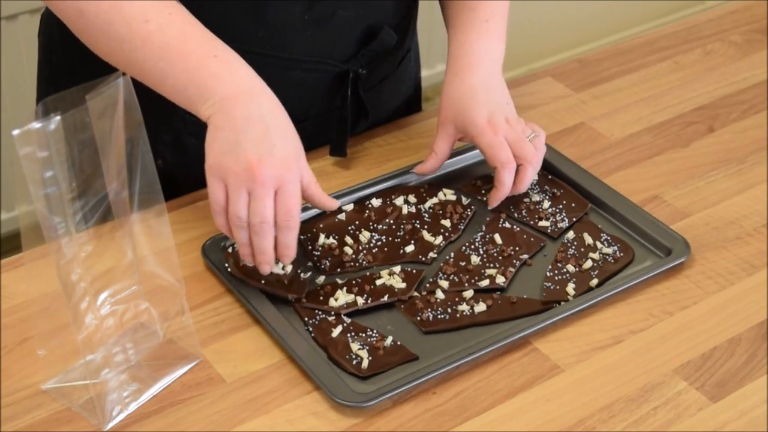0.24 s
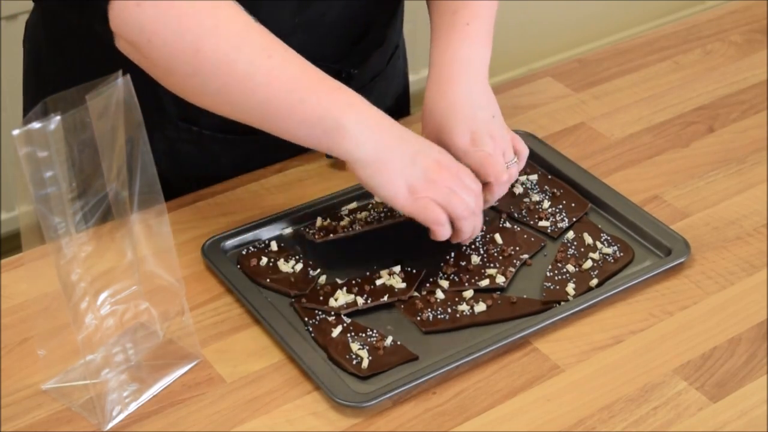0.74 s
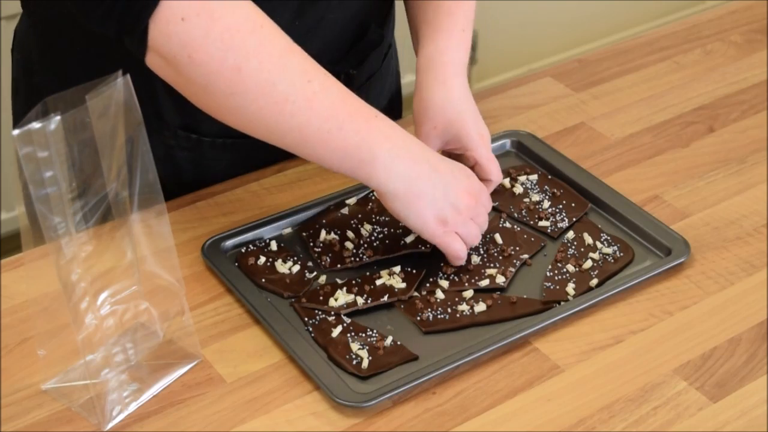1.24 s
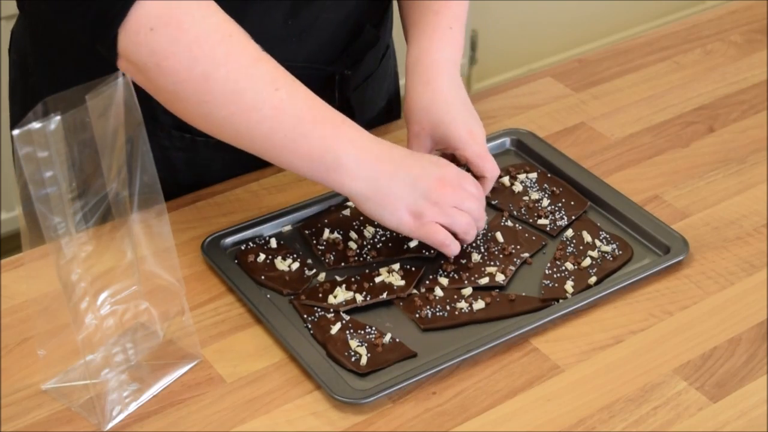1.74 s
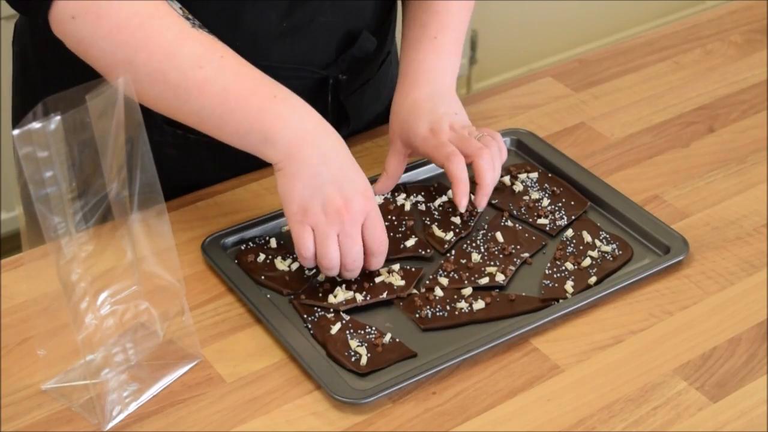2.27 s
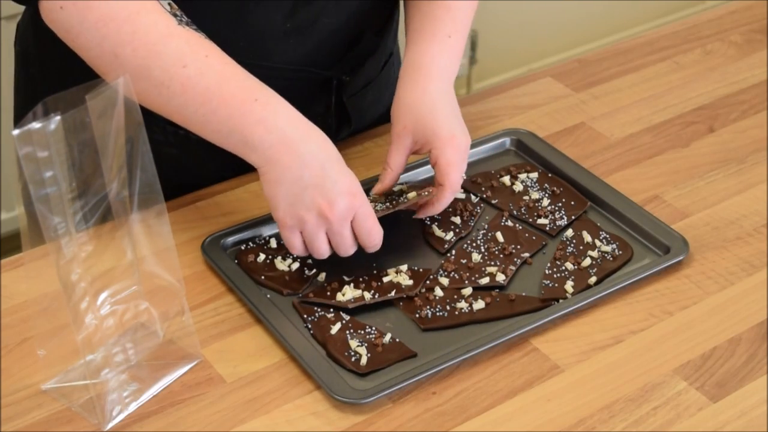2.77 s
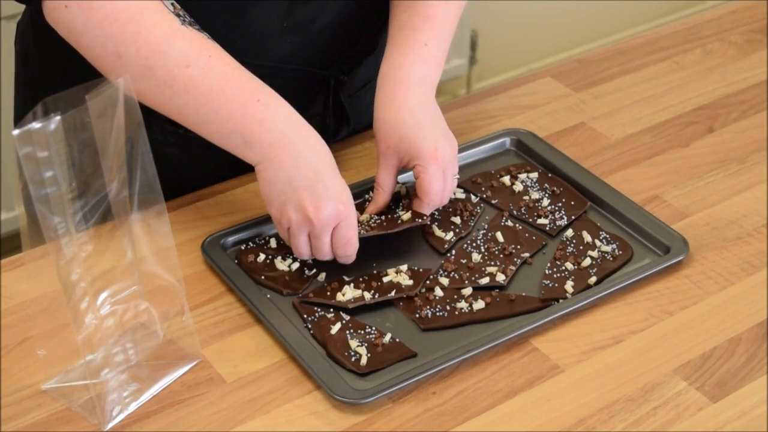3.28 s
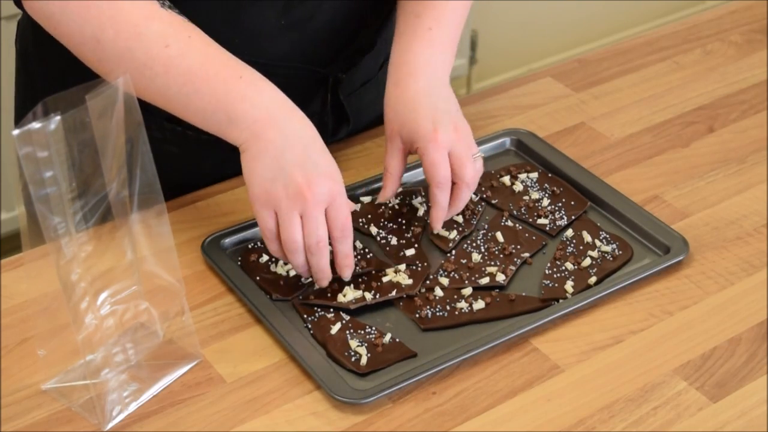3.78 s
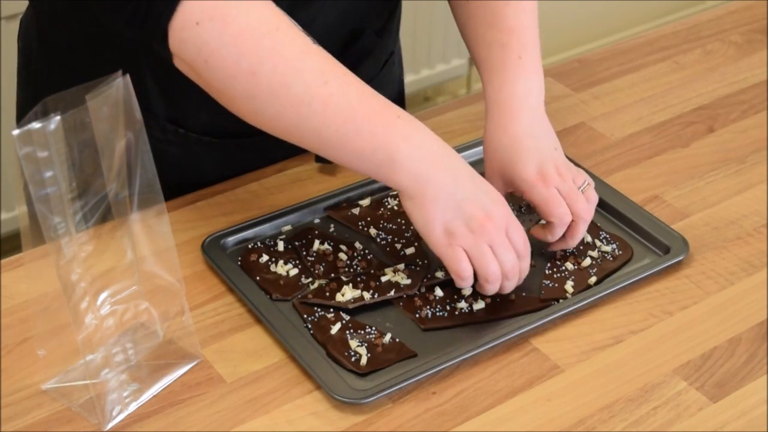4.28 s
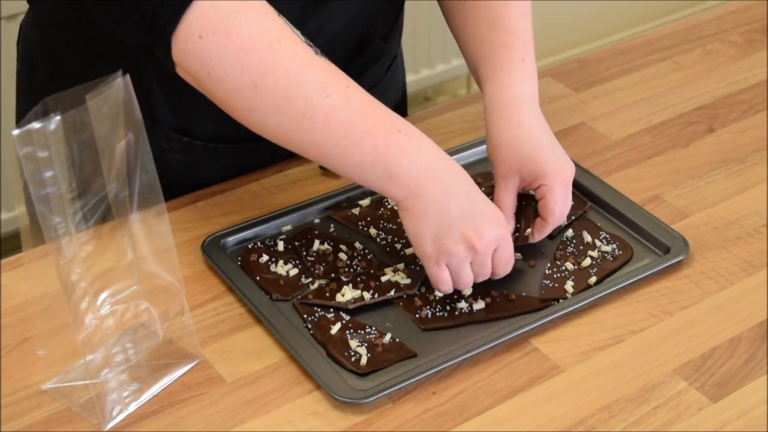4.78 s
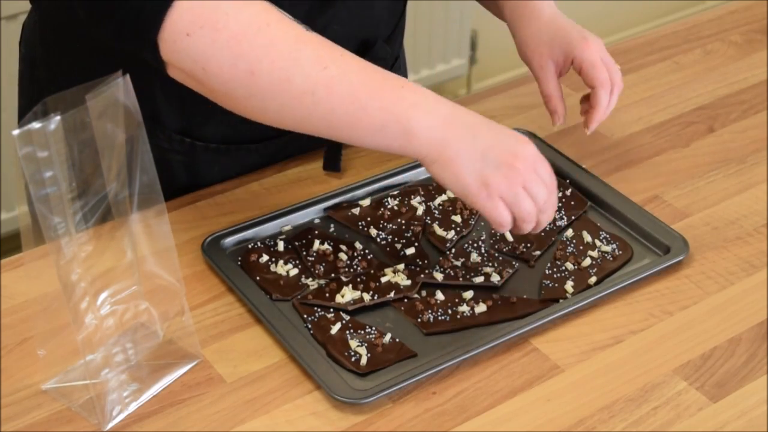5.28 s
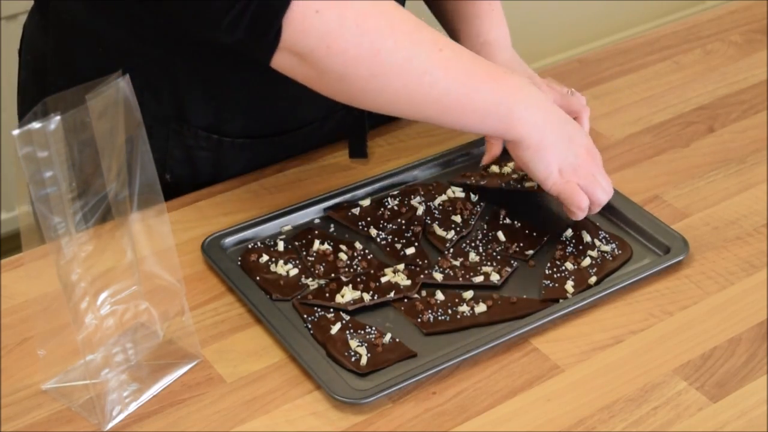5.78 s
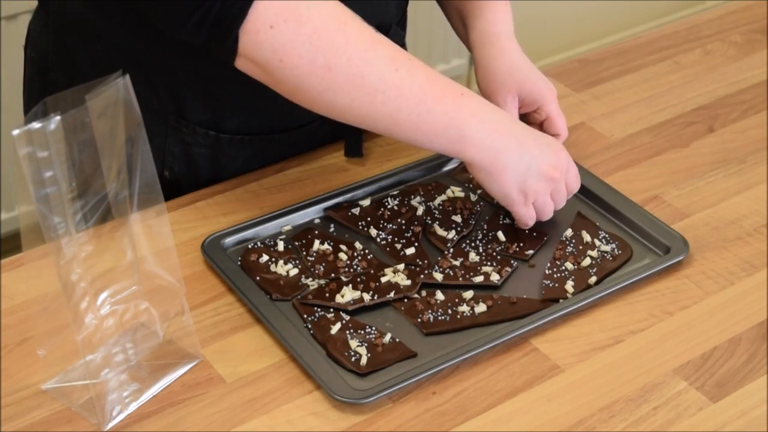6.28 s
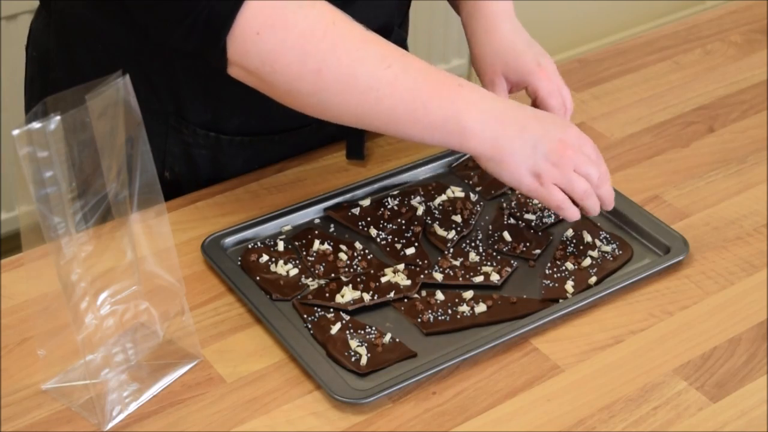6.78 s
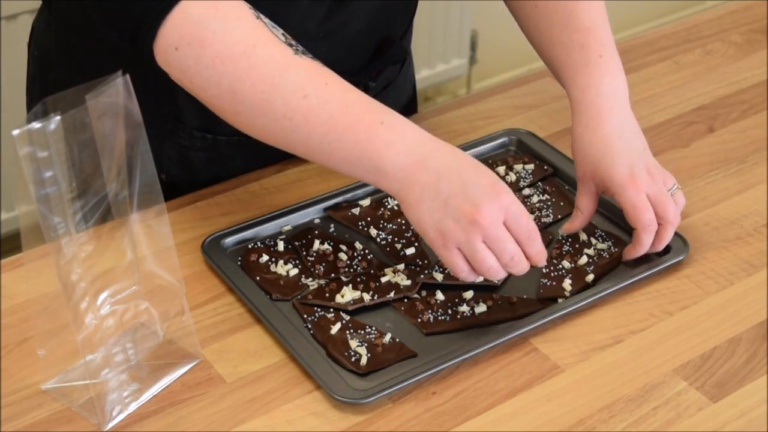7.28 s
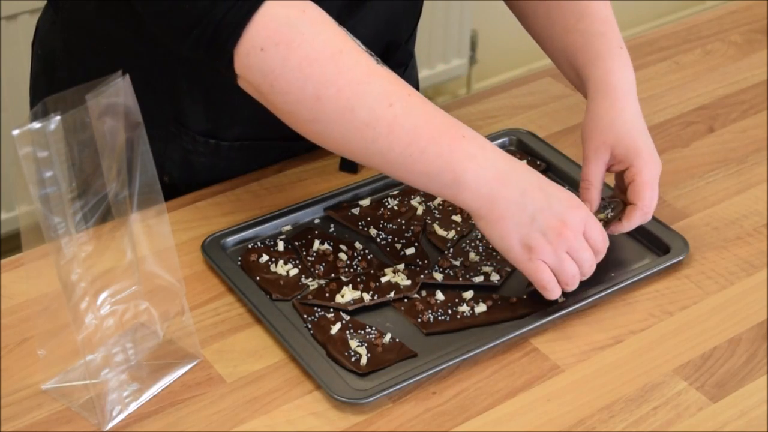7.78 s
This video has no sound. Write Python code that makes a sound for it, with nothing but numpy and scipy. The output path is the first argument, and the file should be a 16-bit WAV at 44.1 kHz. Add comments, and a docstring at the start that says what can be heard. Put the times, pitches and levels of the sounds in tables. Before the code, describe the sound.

Close stereo sound of chocolate slabs snapped by hand over a steel baking tray in a hard-walled kitchen. Light clacks and a faint gritty slide begin at once, with two loud crisp snaps at about 0.26 and 0.35 s and smaller knocks until 0.7. Quiet ticks follow, then sharp cracks at 1.6 and 1.95 s. From 2.2 to 3.2 s come scattered soft clicks, with a firmer one at 2.9. A bright tick at 3.5 leads to a cluster of knocks and scrapes around 3.8, then light handling, with clacks at 4.7 and 5.0. A strong snap lands at 5.75; after a pause, a knock at 6.5 starts a dense clatter from 6.6 to 6.9, tapering into small ticks by 7.7. Short echoes, steady soft room noise and a faint thin appliance whine continue throughout; brief hums come and go, and a faint low drone rises near 6.8 s.

```python
"""Snapping chocolate on a steel tray

Brittle slabs of chocolate are snapped by hand and dropped, nudged and slid on a steel baking tray.
Each contact is a short volley of tiny cracks that sets the slab, the tray and a hard-walled kitchen sounding.
An appliance whirrs faintly behind in steady tones and filtered noise, with a hum that comes and goes.
A low drone swells near the end, over a steady bed of room noise."""
import sys
import numpy as np
from scipy import signal
from scipy.fft import rfft, irfft
from scipy.io import wavfile
from scipy.ndimage import uniform_filter1d

SR = 44100
rng = np.random.default_rng(int(sys.argv[2]) if len(sys.argv) > 2 else 0)


def file_out(sig):
    """Save sig as 16-bit WAV at sys.argv[1]."""
    # one column per channel
    cols = np.atleast_2d(sig).T
    # limit, then scale
    lim = np.clip(cols, -1, 1)
    pcm = np.round(lim * 32767).astype(np.int16)
    wavfile.write(sys.argv[1], SR, pcm)


N = 354123

# ringing tones of the steel tray: pitch_hz, level_db (before the tray's band-pass), t60_s (time to fall 60 dB)
TRAY_MODES = [(252, -41, 0.047), (340, -47, 0.11), (389, -38, 0.085), (684, -32, .11), (877, -32.5, 0.069),
              (1025, -34, 0.067), (1225, -33, .1), (1538, -33, 0.058), (1772, -37, 0.045),
              (2028, -35.5, 0.058), (2280, -33.5, 0.052), (2820, -38.5, .05), (3176, -39, 0.04)]
# plate tones of a slab: ratio_to_pitch, level_db (next to the hump at its pitch)
SLAB_MODES = [(.6, -12), (1.45, -9.5), (1.95, -11.5), (2.5, -16.5)]
SLAB_LOW_HZ, SLAB_TOP_HZ = 597, 4290


def contacts():
    """Each contact is a volley of cracks that builds fast and dies, through slab, fracture edge and tray."""
    # snaps and knocks: start_s, slab_peak_db (estimated from loudness), edge_gain_db and tray_gain_db
    # (both on top of the slab's scaling), slab_pitch_hz, volley_ms (decay time, kept within 1 to 30)
    contact_rows = np.array([(0.004, -30.5, -15, -15, 3030, 13), (0.018, -27, -14, -22, 1070, 16),
                             (0.056, -28.5, -20, -12, 1900, 14), (0.09, -34, -11, -8, 1130, 7.6),
                             (0.111, -40, 1.5, -16, 1950, 12), (0.133, -37, -8.5, -8, 980, 14),
                             (0.142, -39.5, -11, -12.5, 1210, 4.2), (0.244, -35.5, -34, -17, 1018, 5.4),
                             (0.264, -11, -16.5, -17.5, 2100, 6.2), (0.346, -13.5, -11, -17, 2330, 7.8),
                             (0.41, -30, -34, -13, 2190, 17), (0.419, -29, -10, -8.5, 1980, 10),
                             (0.476, -21.5, -15, -19, 1800, 8.8), (0.504, -26.5, -8, -10.5, 1900, 7.2),
                             (0.571, -35.5, -27, -12.5, 1287, 4.4), (0.663, -34, -10.5, -36, 2680, 7),
                             (0.917, -36.5, -9, -18, 1050, 6.5), (1.072, -44.5, -10, -30, 1040, 6.2),
                             (1.153, -44.5, -10, -25, 2260, 11), (1.251, -45, -18, -12, 2100, 8),
                             (1.276, -46, -25, -10, 2200, 6), (1.365, -42, -25, -12, 1460, 4),
                             (1.373, -45.5, 1, -10.5, 1460, 8), (1.581, -20.5, -9, -37, 1770, 2.6),
                             (1.589, -11.5, -8.5, -20, 1720, 6.8), (1.738, -30, -10.5, -22, 1740, 11.6),
                             (1.79, -37.5, -11.5, -26, 1730, 19), (1.953, -13, -14.5, -15.5, 1550, 8.4),
                             (2.208, -30, -23, -29, 1080, 7.7), (2.231, -28.5, -10.5, -13, 1980, 5.4),
                             (2.265, -44, -8, -9, 2040, 9.4), (2.354, -36.5, -20, -33, 1140, 8.7),
                             (2.378, -34.5, -10.5, -20, 1970, 7.1), (2.471, -36, -19, -24, 1030, 24),
                             (2.547, -45, -3.5, -26, 2070, 7.9), (2.887, -28, -9, -36, 1130, 8),
                             (2.893, -22, -12, -16, 1230, 5.4), (3.163, -34, -8.5, -17, 3100, 6.1),
                             (3.459, -21, -1, -10.5, 2080, 7.8), (3.630, -34, -8, -9.5, 1680, 30),
                             (3.694, -41, 1.5, -30, 2400, 26), (3.732, -41, -12, -24, 3000, 7.2),
                             (3.768, -31.5, -15, -14.5, 1530, 27), (3.789, -21, -7, -17.5, 1960, 13),
                             (3.827, -29, -25, -7, 1570, 8.2), (3.87, -32.5, -7, -10, 1950, 7.5),
                             (3.906, -40, -7, -18, 1030, 8.6), (4.097, -36.5, -8.5, -15.5, 2210, 12.5),
                             (4.156, -38, -13, -13, 1000, 13), (4.178, -43, -8, -29, 1270, 35),
                             (4.401, -34.5, -23, -16, 2280, 25), (4.42, -35, -6, -16, 1070, 9),
                             (4.592, -47, 2.5, -18, 2260, 6), (4.737, -37, -9, -11, 2200, 8.1),
                             (4.743, -24, -10.5, -10.5, 2600, 4.6), (4.917, -41.5, -6, -9.5, 2770, 22),
                             (4.939, -36.5, -6, -18, 1720, 14), (4.999, -42.5, -6, -14, 1020, 6.5),
                             (5.044, -21.5, -10, -13.5, 2010, 8.4), (5.074, -35.5, -13, -7, 1680, 31),
                             (5.275, -41.5, 1.5, -16, 3440, 6.1), (5.623, -40.5, -12.5, -10.5, 1650, 35),
                             (5.739, -32.5, -23, -14, 1590, 7.3), (5.750, -16, -8.5, -19, 2050, 15),
                             (5.787, -24, -16, -15, 1780, 7.7), (6.474, -22, -5, -18, 1840, 9.2),
                             (6.625, -38, -10, -18, 2160, 11), (6.644, -31.5, -6.5, -19, 1120, 11),
                             (6.662, -21, -14.5, -16, 1860, 12.8), (6.687, -39, -2, -17, 1800, 11),
                             (6.767, -25, -10.5, -14.5, 1810, 14), (6.806, -28, -2.5, -18.5, 1080, 6.7),
                             (6.826, -32, -17, -16, 1800, 7.9), (6.845, -14.5, -13, -18, 1770, 8),
                             (6.894, -23, -10, -24, 1800, 17), (6.923, -21.5, -8.5, -19.5, 1900, 9.6),
                             (7.242, -36.5, -7.5, -31, 1780, 10), (7.339, -27, -11, -37, 5200, 3.6),
                             (7.354, -34, -13, -37, 1770, 22), (7.403, -37.5, -25, -16, 2700, 18),
                             (7.435, -34, -13, -13, 2100, 35), (7.479, -32, -13.5, -18, 1080, 5.9),
                             (7.536, -34, -17, -25, 1830, 6.1), (7.557, -36.5, -16, -15.5, 1070, 9.3),
                             (7.694, -42, -18, -11.5, 1190, 12), (7.711, -40, -18, -12, 2090, 3.7)])
    # where the pieces meet the tray decides the tone it favours: from_s, favoured_hz
    spot_rows = [(0, 1225), (.05, 880), (.125, 670), (.2, 880), (.33, 2280), (.4, 1025), (1.5, 387),
                 (1.9, 684), (2.8, 1225), (3.4, 684), (3.75, 1225), (3.81, 877), (4.3, 1025), (5.7, 1990),
                 (5.77, 877), (6.4, 390), (7.46, 684)]
    spot_lift_db, spot_width_octaves = 10, 0.15
    tray_late_s = 0.007954   # the piece meets the steel just after it cracks
    count, size = len(contact_rows), 4096

    # age counts time in volley decay times
    age = np.arange(size) / SR / np.clip(contact_rows[:, 5:6] / 1000, 1e-3, 0.03)
    volleys = cracks((count, size), per_s=4500, spread_db=3.0) * (1 - np.exp(-age / 0.075))
    # the break runs in slight fits and starts
    splinters = resonate(rng.standard_normal((count, size)), 96, 220)
    fits = from_db(0.51 * rms_one(splinters) * np.minimum(age, 1))
    crumbs = 0.045 * np.exp(-age / 3.6)   # they rattle on after the break
    volleys *= fits * (np.exp(-age) + crumbs)

    # each tray tone is stronger near the favoured one, with some chance
    since, favoured = np.transpose(spot_rows)
    spot_index = np.maximum(np.searchsorted(since, contact_rows[:, :1]) - 1, 0)
    octaves = np.log2(np.array(TRAY_MODES)[:, 0] / favoured[spot_index])
    lift_db = spot_lift_db * np.exp(-(octaves / spot_width_octaves) ** 2)
    mode_gains = from_db(lift_db + rng.normal(0, 2.56, octaves.shape))
    mode_gains = mode_gains * rng.choice([-1, 1], octaves.shape)   # each tone starts up or down
    odd_shapes = 2 ** rng.normal(0, 0.07, (count, len(SLAB_MODES)))

    direct, pushes = np.zeros(N + size), np.zeros((len(TRAY_MODES), N + size))
    for row, volley, gains, odd_shape in zip(contact_rows, volleys, mode_gains, odd_shapes):
        start_s, peak_db, edge_db, tray_db, pitch_hz, _ = row
        at = slice(round(start_s * SR), round(start_s * SR) + size)
        body = slab(volley, pitch_hz, odd_shape)
        loudest_power = np.max(uniform_filter1d(body ** 2, size=200))
        scale = from_db(peak_db) / np.sqrt(loudest_power * 6)   # a peak is about root 6 times the rms
        direct[at] += scale * (body + from_db(edge_db) * edge(volley))
        # the tray gets one blow, then a rattle
        blow = np.sqrt(np.sum(volley ** 2)) * (np.arange(size) == 0)
        knock = 0.35 * volley + blow
        pushes[:, at] += scale * from_db(tray_db) * gains[:, None] * knock
    return direct[:N] + tray(lambda k: np.pad(pushes[k], (round(tray_late_s * SR), 0))[:N])


def slab(x, hz, odd_shape):
    """A piece of chocolate: a hump at its pitch and dull plate tones shifted by its odd shape."""
    body = resonate(x, hz, 0.35 * hz)
    for (ratio, db), odd in zip(SLAB_MODES, odd_shape):
        body = body + from_db(db) * resonate(x, hz * ratio * odd, 0.4 * hz * ratio)
    return band(body, SLAB_LOW_HZ, max(SLAB_TOP_HZ, 1.28 * hz))   # small chips reach higher


def edge(x):
    """Crisp top of a fresh fracture: wide high resonances, every second one turned upside down."""
    # pitch_hz, width_hz, level_db
    edge_rows = [(6230, 6700, -7), (7720, 2920, 0), (11270, 3600, -17.5)]
    modes = sum((-1) ** k * from_db(db) * resonate(x, hz, width) for k, (hz, width, db) in enumerate(edge_rows))
    return band(modes, 5100, 22000)


def tray(drive):
    """Steel sheet damped by chocolate and the worktop: drive(k) sets tone k ringing."""
    modes = sum(from_db(db) * ring(drive(k), hz, t60) for k, (hz, db, t60) in enumerate(TRAY_MODES))
    return band(modes, 257, 3570)


def sliding():
    """A piece pushed over the steel clicks on clumped grit, heard through slab, edge and tray."""
    # pushes: full_force_s, held_s, scrape_level_db
    slide_rows = [(0.0, .45, -59), (.75, 0.22, -63.5), (1.83, .03, -61), (2.37, 0.027, -56),
                  (3.53, 0.094, -59), (3.78, .03, -53.5), (4.0, .45, -65.5), (4.96, 0.062, -56),
                  (5.55, 0.27, -58.5), (6.4, 0.23, -60.5), (6.84, 0.017, -44.5), (7.1, 0.27, -64),
                  (7.42, 0.028, -51.5), (7.7, 0.2, -64)]
    clumps = rms_one(resonate(rng.standard_normal(N), 12.0, 31))
    grit = cracks(N, per_s=4000, spread_db=2.5) * from_db(2.1 * clumps)
    body = band(grit, SLAB_LOW_HZ, SLAB_TOP_HZ)
    body = body + from_db(-8.0) * edge(grit) + from_db(-1.0) * tray(lambda k: grit)
    return swells(slide_rows, rise_db_per_s=89, fall_db_per_s=91) * rms_one(body)


def kitchen(x):
    """Wall echoes thicken to a noisy tail that dies band by band, partly shared by both channels."""
    # how long the echoes last: pitch_hz, t60_s (time to fall 60 dB)
    echo_times = [(200, 0.65), (1000, 0.29), (4000, 0.26), (12000, 0.34)]
    # left-right likeness of the echoes: pitch_hz, likeness (1 = the same)
    echo_likeness = [(300, 0.99), (1000, 1), (4000, 0.86), (12000, 0.34)]
    size = SR // 2
    t, tail = np.arange(size) / SR, 0
    # the echoes begin after 2 ms and are at full density 5.6 ms later
    noise = rng.standard_normal((2, size)) * np.clip((t - 0.002) / 0.0056, 0, 1)
    for hz in np.geomspace(150, 14000, 12):
        fade = from_db(-60 * t / at_hz(echo_times, hz))
        mid, side = resonate(noise, hz, 0.45 * hz) * fade
        tail = tail + stereo(mid, side, at_hz(echo_likeness, hz))
    tail = tail / np.sqrt(np.sum(tail[0] ** 2))
    return signal.fftconvolve(x[None], tail, axes=1)[:, :N]


def appliance():
    """Thin steady motor tones and a breathy whistle of air through the fan."""
    # motor tones: pitch_hz, rms_level_db
    whine_rows = [(2256, -67.5), (4511, -82), (6584, -83.5), (6767, -94)]
    whistle_hz, whistle_width_hz, whistle_db = 2940, 110, -71.5
    t = np.arange(N) / SR
    air = rng.standard_normal(N)
    for _ in range(2):   # filtered twice for a narrower whistle
        air = resonate(air, whistle_hz, whistle_width_hz)
    tones = sum(np.sqrt(2) * from_db(db) * np.sin(2 * np.pi * (hz * t + rng.random())) for hz, db in whine_rows)
    return tones + from_db(whistle_db) * rms_one(air)


def hum():
    """A slightly wavering tone that comes and goes."""
    # swells: full_strength_s, held_s, rms_level_db
    hum_rows = [(.12, 0.37, -58), (3.47, 0.063, -62), (6.33, 0.093, -64)]
    return swells(hum_rows, rise_db_per_s=154, fall_db_per_s=88) * wavering(252, waver_hz=4.0)


def rumble():
    """A low drone climbing like a far engine, with an octave above it that lingers."""
    # swells: full_strength_s, held_s, drone_rms_level_db
    rumble_rows = [(6.8, 0.45, -65.5), (8.0, .1, -69)]
    first_hz, climb_hz_per_s = 70.3, 5.5   # pitch when first at full strength
    octave_db = 1   # next to the drone
    hz = first_hz + climb_hz_per_s * (np.arange(N) / SR - rumble_rows[0][0])
    drone = swells(rumble_rows, rise_db_per_s=60, fall_db_per_s=30) * wavering(hz, waver_hz=3.6)
    octave = swells(rumble_rows, rise_db_per_s=60, fall_db_per_s=15) * wavering(2 * hz, waver_hz=4.8)
    return drone + from_db(octave_db) * octave


def room_tone():
    """Steady noise shaped by pitch, more alike in both channels at low pitches than at high ones."""
    # colour of the noise: pitch_hz, relative_level_db (per Hz)
    air_rows = [(22, -23), (50, -9.5), (70, -1.5), (92, -5.5), (118, 2), (160, -3), (242, 0), (550, -1),
                (1000, 0), (2600, -6.5), (3050, -6), (3400, -12), (9840, -22), (13000, -27.5), (16000, -34)]
    # left-right likeness of the noise: pitch_hz, likeness (1 = the same)
    air_likeness = [(60, 1), (240, 0.92), (950, 0.74), (3770, 0.028), (15000, 0.42)]
    air_db = -54.5
    hz = np.maximum(np.fft.rfftfreq(N, 1 / SR), 1)
    mid, side = rfft(rng.standard_normal((2, N))) * from_db(at_hz(air_rows, hz))
    return from_db(air_db) * rms_one(irfft(stereo(mid, side, at_hz(air_likeness, hz)), N))


def from_db(db):
    """Decibels to gain."""
    return 10 ** (np.asarray(db) / 20)


def rms_one(x):
    """Scale to an rms (average strength) of 1."""
    return x / np.sqrt(np.mean(x ** 2) + 1e-20)


def at_hz(points, hz):
    """Read a curve between its points on a log-frequency axis."""
    point_hz, values = np.array(points).T
    return np.interp(np.log(hz), np.log(point_hz), values)


def stereo(mid, side, likeness):
    """Mix two independent noises into left and right channels that are alike by the given amount."""
    alike = np.clip(likeness, 0, 1)
    return np.sqrt(1 + alike) * mid + np.sqrt(1 - alike) * side * [[1], [-1]]


def resonate(x, hz, width_hz):
    """Two-pole resonance, gain about 1 on top."""
    r = np.exp(-np.pi * width_hz / SR)
    w = 2 * np.pi * hz / SR
    return signal.lfilter([(1 - r * r) / 2, 0, (r * r - 1) / 2], [1, -2 * r * np.cos(w), r * r], x)


def ring(x, hz, t60):
    """A unit click sets a dying sine of starting height 1 ringing."""
    r, w = from_db(-60 / (t60 * SR)), 2 * np.pi * hz / SR
    return signal.lfilter([0, np.sin(w)], [1, -2 * r * np.cos(w), r * r], x + 1e-18)


def cracks(shape, per_s, spread_db):
    """Sparse clicks of uneven size and random sign."""
    sizes = from_db(spread_db * np.minimum(rng.exponential(1, shape), 4)) * rng.choice([-1, 1], shape)
    return sizes * (rng.random(shape) < per_s / SR)


def band(x, low_hz, top_hz):
    """Steep band-pass."""
    return signal.sosfilt(signal.butter(3, [low_hz, top_hz], "band", fs=SR, output="sos"), x)


def wavering(hz, waver_hz):
    """A tone of rms 1 whose pitch wanders at random, about 11 times a second."""
    wander = rms_one(resonate(rng.standard_normal(N), 11, 12))
    return np.sqrt(2) * np.sin(2 * np.pi * np.cumsum(hz + waver_hz * wander) / SR)


def swells(rows, rise_db_per_s, fall_db_per_s):
    """Gain of sounds that rise steadily in dB, hold and fade; their powers add."""
    t = np.arange(N) / SR
    power = 0
    for full_s, held_s, db in rows:
        before, after = np.maximum(full_s - t, 0), np.maximum(t - full_s - held_s, 0)
        power = power + from_db(db - rise_db_per_s * before - fall_db_per_s * after) ** 2
    return np.sqrt(power)


def scene():
    """Hands at the tray in the kitchen's echoes and air, a little right of centre, with the machine sounds."""
    hands = contacts() + sliding()
    kitchen_db = -8.5
    room = hands + from_db(kitchen_db) * kitchen(hands) + room_tone()
    return room * from_db([[-0.3], [0.3]]) + appliance() + hum() + rumble()


def record(dry):
    """The treble is cut steeply: 60 dB down from 16.5 kHz up."""
    return signal.sosfilt(signal.cheby2(12, 60, 16500, fs=SR, output="sos"), dry)


dry = scene()
out = record(dry)
file_out(out)
```